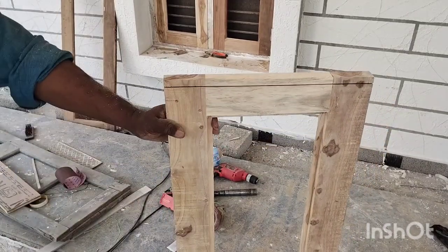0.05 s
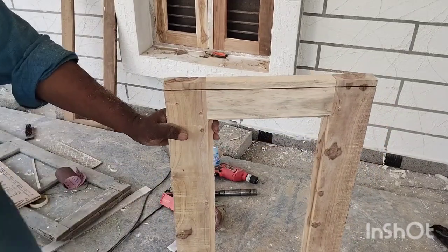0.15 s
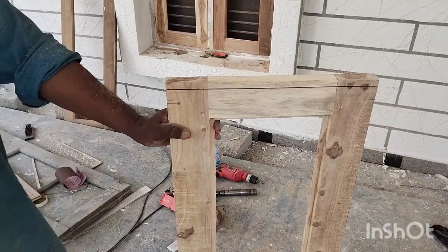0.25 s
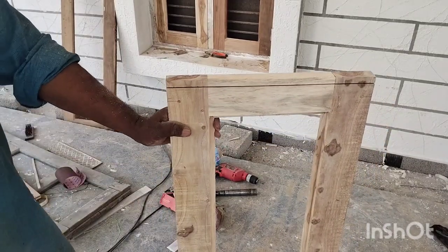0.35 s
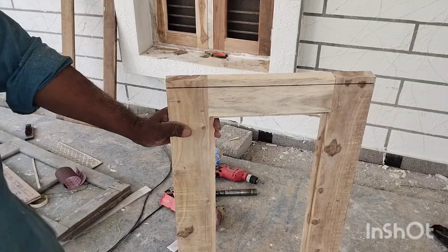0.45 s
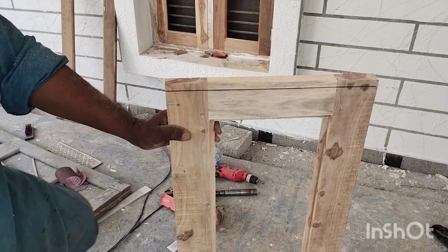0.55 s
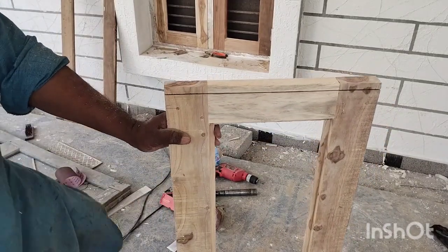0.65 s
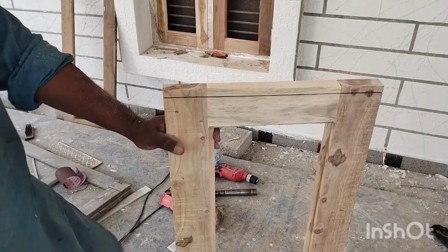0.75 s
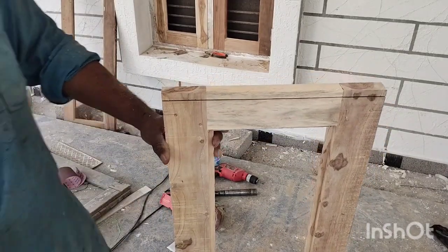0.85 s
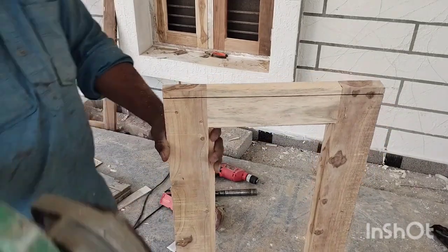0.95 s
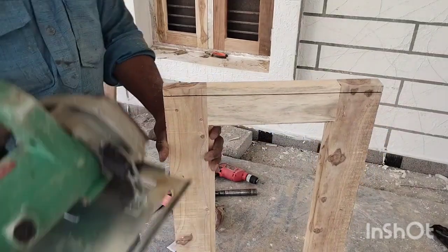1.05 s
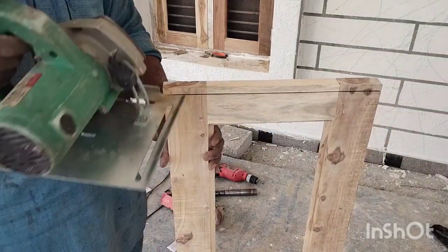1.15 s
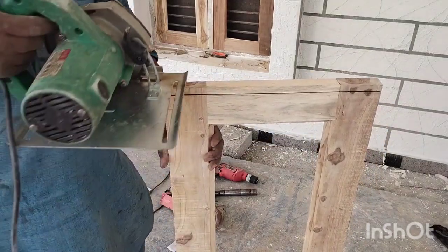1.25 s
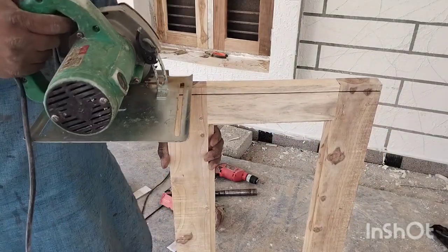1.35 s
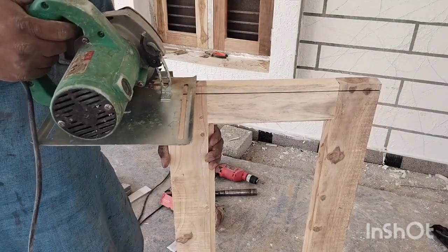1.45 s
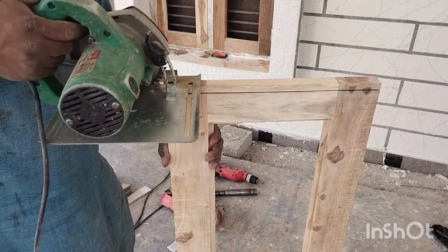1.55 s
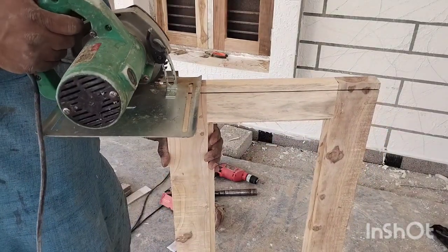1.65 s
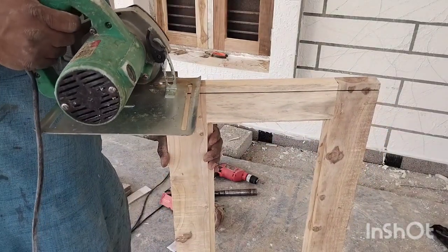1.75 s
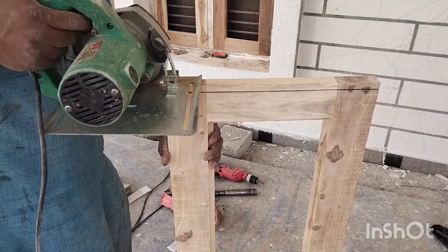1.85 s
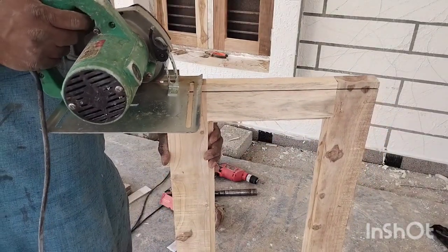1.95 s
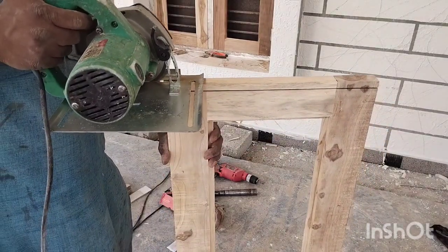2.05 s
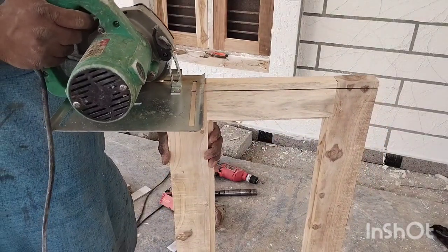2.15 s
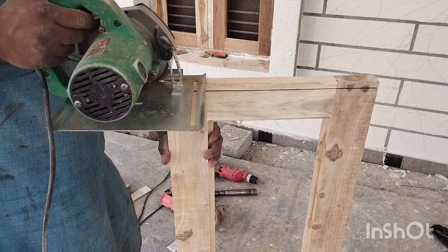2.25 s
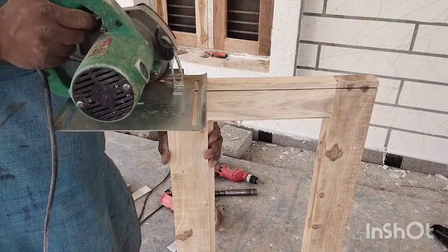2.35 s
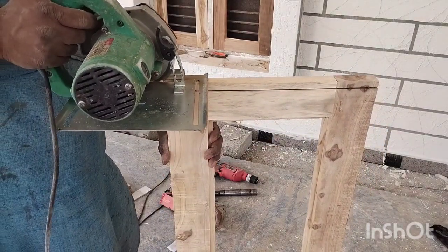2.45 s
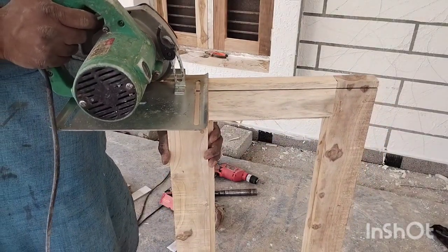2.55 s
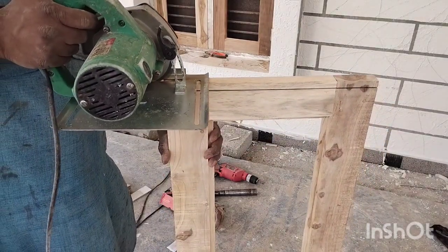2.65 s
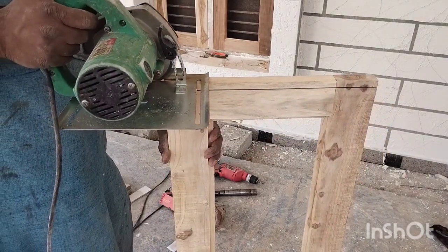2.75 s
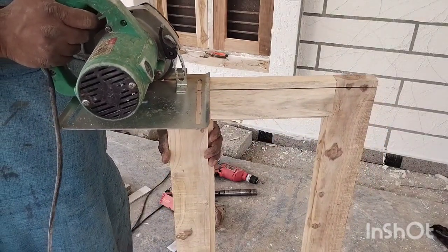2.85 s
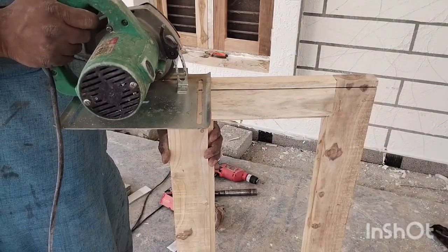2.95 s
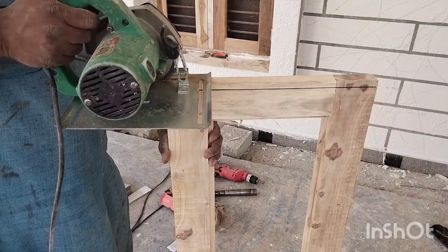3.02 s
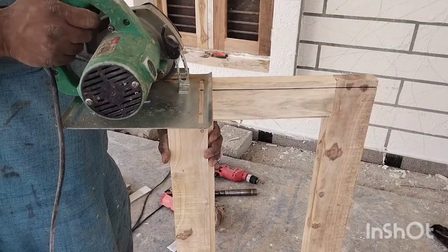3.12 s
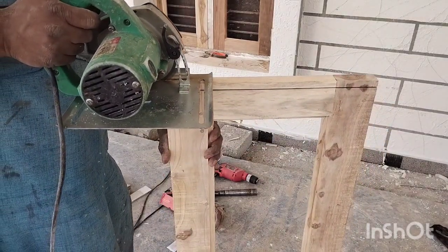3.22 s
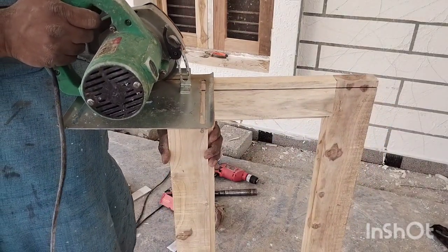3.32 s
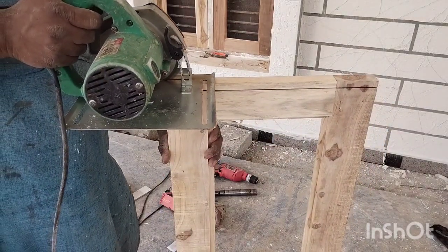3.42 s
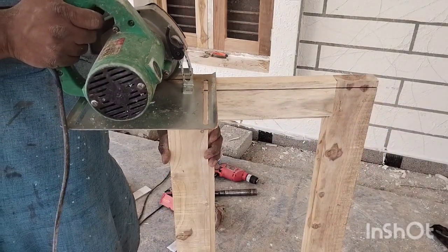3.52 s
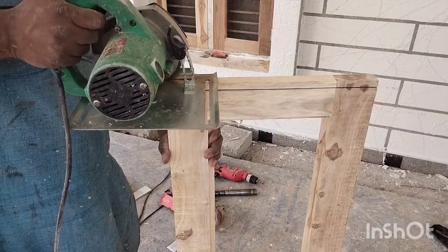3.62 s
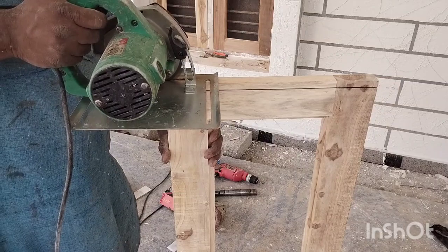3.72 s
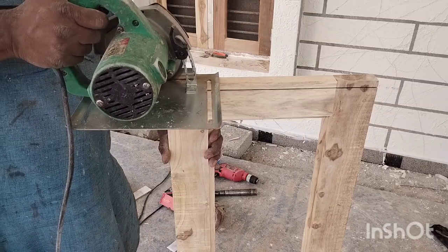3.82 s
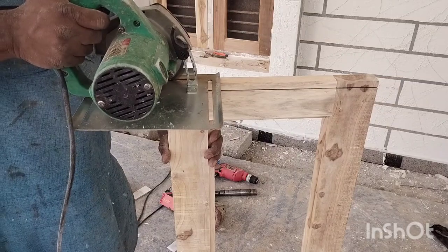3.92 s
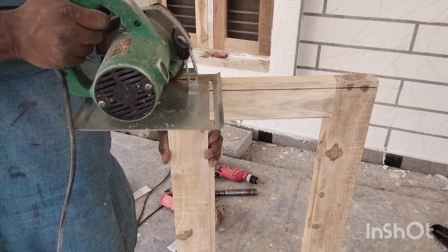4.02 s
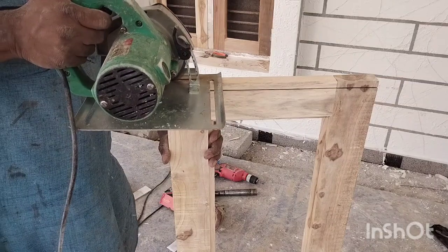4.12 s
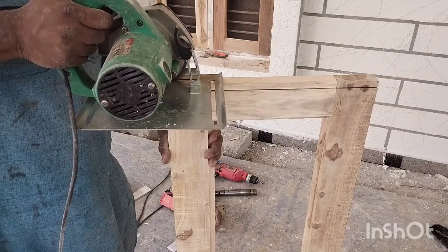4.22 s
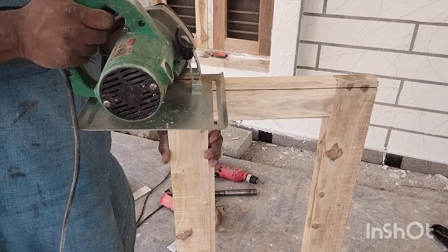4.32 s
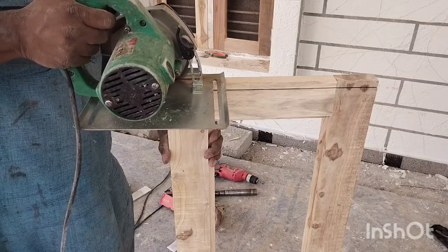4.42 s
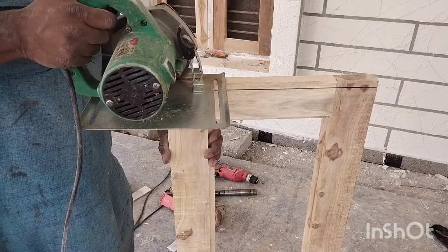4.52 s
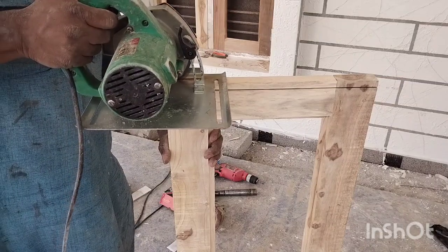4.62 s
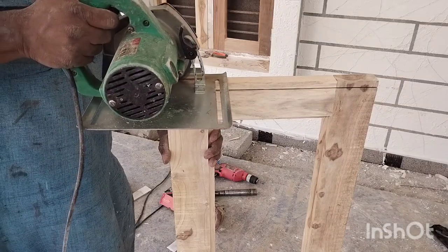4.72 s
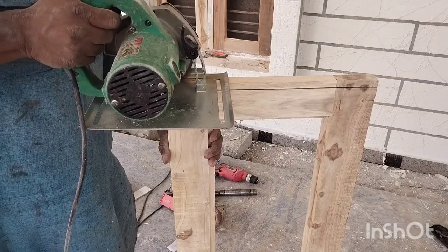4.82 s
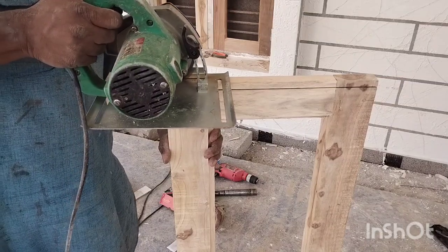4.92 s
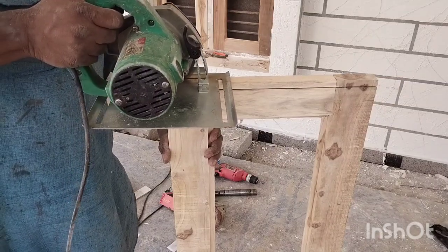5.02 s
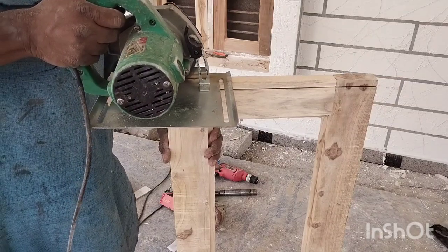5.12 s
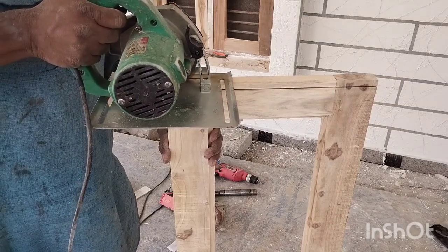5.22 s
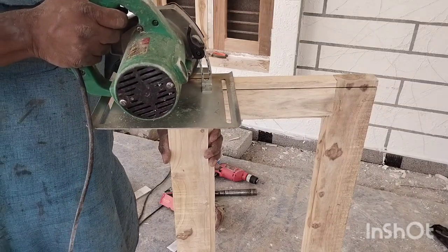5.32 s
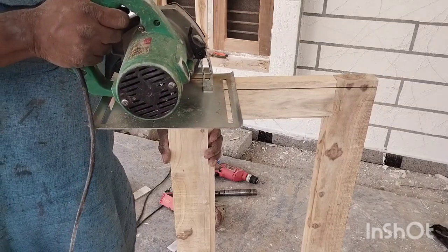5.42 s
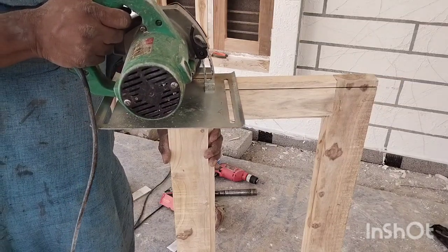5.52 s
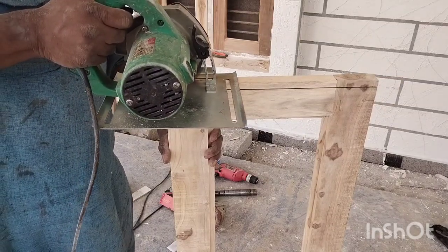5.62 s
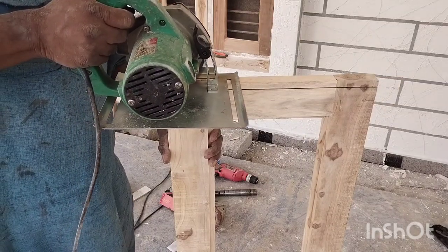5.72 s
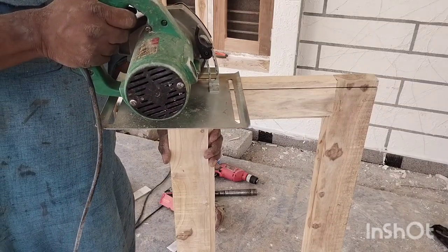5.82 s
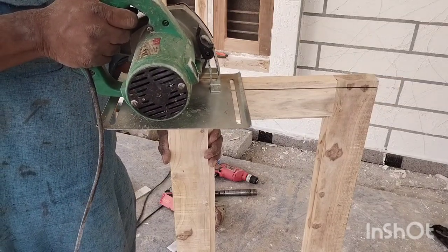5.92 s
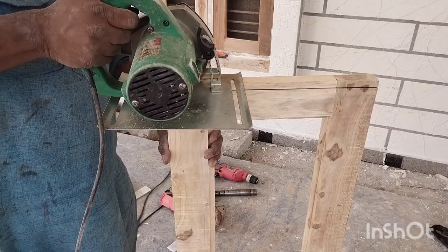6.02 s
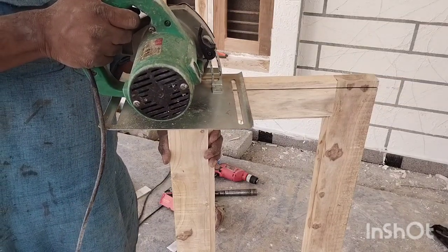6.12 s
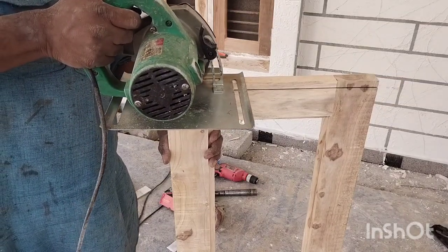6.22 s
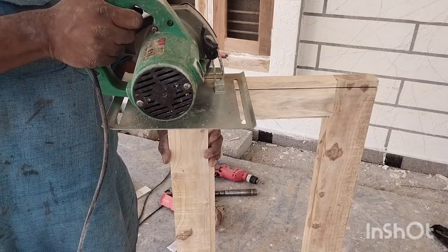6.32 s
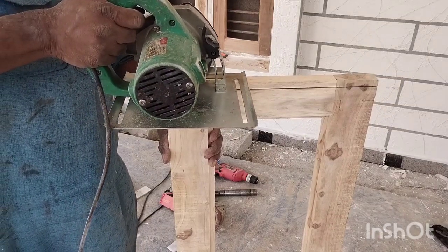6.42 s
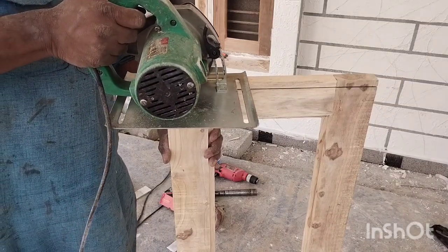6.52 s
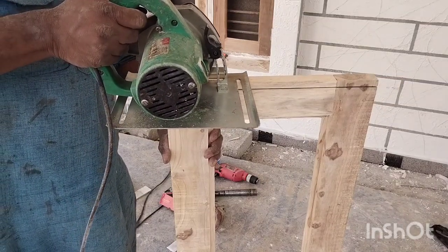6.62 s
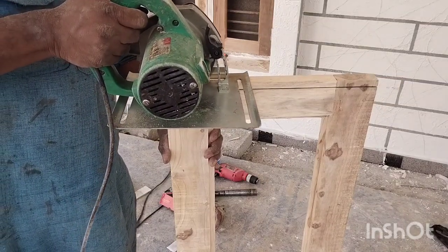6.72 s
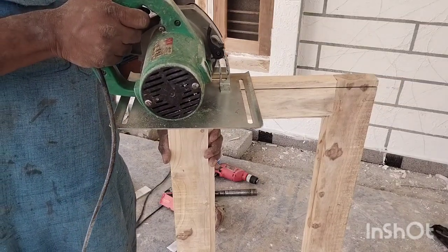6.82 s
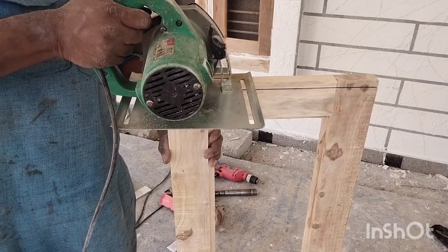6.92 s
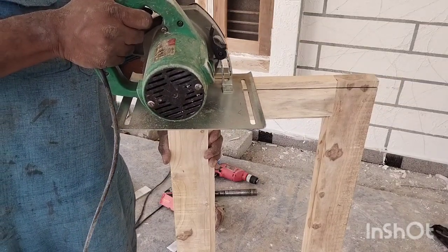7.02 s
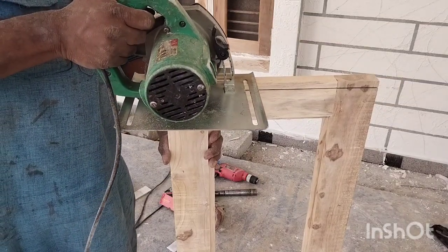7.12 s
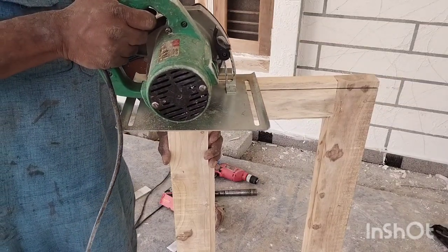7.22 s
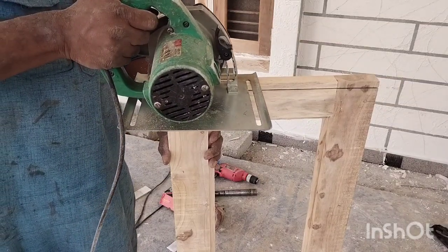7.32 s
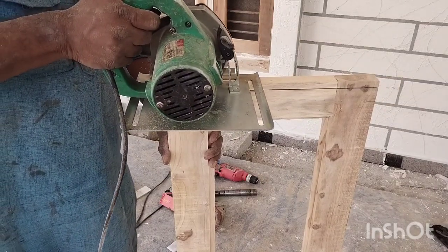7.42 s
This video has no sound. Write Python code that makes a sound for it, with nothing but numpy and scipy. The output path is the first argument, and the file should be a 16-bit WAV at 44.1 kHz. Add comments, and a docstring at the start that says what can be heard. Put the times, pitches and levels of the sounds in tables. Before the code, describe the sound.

Close by in a walled yard, a handheld electric saw is set on a wooden frame with light knocks, cloth rustle and a brief metallic chatter. The motor starts whining and the blade screeches into the wood. A loud, steady rasp of cutting follows, with ringing steel and a high whistle that glides up, holds, then falls as the motor begins to slow.

```python
"""A walled yard: a hand-held power saw is lifted onto a wooden frame and cuts into it.
Sleeves rustle, hands rub, the frame rings to knocks and the steel base plate rattles on the wood.
The motor starts and whines in its fan's rush. Teeth tear fibres in a dense rasp, the disc
screeches and sings in its modes, and a piercing whistle glides above. Near the end the motor sags."""
import sys
import numpy as np
from scipy import signal
from scipy.fft import rfft, irfft, next_fast_len
from scipy.io import wavfile
from scipy.ndimage import map_coordinates

SR = 44100
rng = np.random.default_rng(int(sys.argv[2]) if len(sys.argv) > 2 else 0)


def store_pcm(level_fs):
    """Save levels as 16-bit WAV."""
    pcm = np.round(np.clip(level_fs, -1, 1) * 32767).astype(np.int16)
    wavfile.write(sys.argv[1], SR, np.atleast_2d(pcm).T)


N = 328986
START_S, REV_S, SAG_S = 2.455, 3.255, 6.91
WORKING_HZ, USUAL_CUT_DB = 528, -31.5


# tooth bite: (time [s], relative level [dB])
BITE_DEPTH = [(2.5, -36), (2.68, -38), (2.92, -40.5), (3.14, -35.5), (3.28, -27), (3.5, -32.5), (3.72, -28),
              (4.3, -27.5), (4.62, -26), (4.97, -31), (5.35, -28), (5.75, -29), (6.2, -31), (6.8, -31.5),
              (7.22, -36), (7.45, -31.5)]
# tearing fibres: (frequency [Hz], gain [dB])
RASP_SPECTRUM = [(25, -61), (120, -33.5), (400, -14), (900, -6), (1600, -3.5), (2400, -0.5), (2900, 0),
                 (4100, 6), (5400, 3.5), (7000, 2.5), (8200, 9.5), (9000, -2), (11000, -5), (14000, -12)]
def cutting(wood_db=2.5, blade_db=11.5, crossover_hz=2200):
    """Teeth tear fibres in dense grains: lows from the wood, highs from the blade."""
    cut_db, = curves(BITE_DEPTH)
    bite = amp(cut_db + 0.9 * wobble(60)) * grains(rate_hz=2800, spread_db=3, life_s=0.0033)
    rasp = colour(RASP_SPECTRUM)
    lowpass = lambda f: 1 / (1 + (f / crossover_hz) ** 4)
    wood = amp(wood_db) * rush(lambda f: rasp(f) * lowpass(f)) * fade(2.4, 0.1)
    entry = 0.3 * fade(2.7, 0.36) + 0.69 * fade(3.3, 0.047)
    blade = amp(blade_db) * rush(lambda f: rasp(f) * (1 - lowpass(f))) * entry
    return bite * (wood + blade)


# whistle glide: (time [s], pitch [Hz])
WHISTLE_GLIDE = [(3.55, 7150), (3.63, 7420), (3.7, 7640), (3.8, 7880), (3.9, 8040), (4.2, 8242),
                 (4.54, 8285), (5.08, 8075), (5.8, 7907), (6.15, 7987), (6.78, 8040), (6.92, 7800),
                 (7.02, 7680), (7.1, 7200)]
def whistle(undertone_ratio=0.585, hum_divisor=40):
    """A piercing tone, as of teeth whipping the air, over an undertone and a faint hum."""
    pitch_hz, = curves(WHISTLE_GLIDE)
    angle = phase(pitch_hz * (1 + 0.0004 * wobble(60)))
    envelope = amp(-18) * stroke(3.47, 2.3, attack_s=0.21, release_s=0.51) * (1 - fade(7.1, 0.05))
    flutter = amp(2 * wobble(22) + wobble(5))
    pair = np.sin(angle) + amp(-15) * np.sin(undertone_ratio * angle)
    tone = yard(envelope * flutter * pair, wet_db=-10)
    hum_angle = phase(pitch_hz / hum_divisor * shaft_hz() / WORKING_HZ) + 0.6 * wobble(40)
    hum = sum(amp(db) * np.sin(k * hum_angle) for k, db in [(1, -47), (2, -40), (4, -38.5)])
    swell = amp(1.8 * wobble(14)) * fade(3.7, 0.35)
    return tone + yard(swell * hum, wet_db=-10) * (1 - fade(6.75, 2.3))


# thin partials: (pitch at working speed [Hz], slope [Hz per shaft Hz], width [Hz], relative level when slow
# [dB], relative level at full speed [dB])
GLIDING_PARTIALS = [(3190, 6.2, 55, -34, -35), (4090, 7.7, 55, -33, -38), (4020, -5, 60, -35, -42),
                    (5400, 11.2, 45, -33, -34), (6870, 14.2, 60, -27, -26), (7890, 14.9, 120, -28, -37),
                    (8455, 16.2, 70, -23, -29), (8930, 16.8, 90, -31, -46), (7300, -18.5, 75, -34, -40),
                    (8380, -8, 85, -34, -44), (10160, 18, 70, -32, -36), (8630, -22, 70, -35, -46),
                    (9860, -9, 70, -30, -36), (11920, 20.5, 70, -32, -39), (10170, -22.5, 60, -32, -39),
                    (13790, 23.5, 80, -34, -36), (14300, 27, 140, -34, -50), (11340, -31, 85, -34, -40),
                    (13170, -16.5, 100, -35, -37)]
def whine(core_share=0.35, damping_db_per_db=0.26):
    """Thin partials: some rise with the motor's speed and whine, others glide against it."""
    cut_db, = curves(BITE_DEPTH)
    offset_hz = shaft_hz() + 0.5 * wobble(30) - WORKING_HZ
    full = full_speed()
    damping_db = damping_db_per_db * (cut_db - USUAL_CUT_DB)  # a deeper bite damps the partials
    out = np.zeros((2, N))
    for hz, slope, width_hz, slow_db, full_db in GLIDING_PARTIALS:
        level_db = slow_db * (1 - full) + (full_db - damping_db) * full
        tone = amp(level_db) * np.exp(1j * phase(hz + slope * offset_hz))
        # clean core and noisy skirt, drawn per ear
        core = core_share * np.exp(1j * rng.normal(0, 0.6, (2, 1)))
        skirt = np.sqrt(1 - core_share ** 2) * np.array([flicker(width_hz), flicker(width_hz)])
        out += np.sqrt(2) * np.real(tone * (core + skirt))
    return out * amp(1 + 2 * wobble(25)) * fade(START_S, 0.035)


# modes of the lightly rubbing blade: (frequency [Hz], width [Hz], gain [dB])
SCREECH_MODES = [(2210, 60, 0), (2390, 170, -5), (2900, 350, -13), (4000, 900, -14), (6350, 380, -7),
                 (6830, 70, -2), (12400, 700, -10.5)]
# blade entering the wood: (start [s], length [s], level [dB])
ENTRY_GROANS = [(2.597, 0.43, -32), (2.973, .33, -27)]
# blade modes at working speed: (frequency [Hz], width [Hz], gain [dB])
SINGING_MODES = [(2650, 160, -12), (3650, 120, -15), (4150, 90, -12), (6520, 300, -4), (7380, 110, 2),
                 (11700, 130, -12), (12150, 450, -16)]
def singing_blade(damping_db_per_db=0.41):
    """The disc screeches and groans on entry, sings at full speed and rasps again near the end."""
    cut_db, = curves(BITE_DEPTH)
    entry = fade(START_S, 0.047) * (1 - fade(3.4, 0.26))
    screech = amp(-23.5 + 3.4 * wobble(20)) * entry * rush(steel(SCREECH_MODES))
    strain = sum(amp(db) * stroke(s, length_s, attack_s=0.094, release_s=0.06)
                 for s, length_s, db in ENTRY_GROANS)
    groan = strain * grains(rate_hz=500, spread_db=2, life_s=0.0047) * rush(steel([(2180, 660, 0)]))
    singing_db = -19 - damping_db_per_db * (cut_db - USUAL_CUT_DB) + 2.2 * wobble(14)
    singing = amp(singing_db) * full_speed() * (clock() > REV_S) * rush(steel(SINGING_MODES))
    ending = amp(-22.5 + 2.9 * wobble(21)) * fade(6.3, 0.16)
    late_rasp = ending * rush(steel([(6300, 310, 8), (7220, 100, -13)]))
    return screech + groan + singing + late_rasp


# thin squeals: (start [s], end [s], first pitch [Hz], last pitch [Hz], relative level [dB])
THIN_SQUEALS = [(2.6, 3.3, 2221, 2196, -30), (2.473, 2.77, 5482, 5488, -33), (2.52, 3.1, 7630, 7440, -25.5),
                (3.33, 3.62, 6350, 6810, -23), (7.04, 7.26, 7400, 6300, -22), (7.22, 7.5, 3075, 3010, -30)]
def squeals(gain_db=1.5):
    """Thin, unsteady squeals: held tones, the motor's whine sagging and climbing, the whistle's fall."""
    out = np.zeros(N)
    for start_s, end_s, first_hz, last_hz, db in THIN_SQUEALS:
        pitch_hz = np.interp(clock(), [start_s, end_s], [first_hz, last_hz]) + 14 * wobble(160)
        gate = fade(start_s, 0.021) * (1 - fade(end_s, 0.039))
        out += amp(db + gain_db) * gate * np.sqrt(2) * np.sin(phase(pitch_hz))
    return yard(out * amp(2.1 * wobble(35)), wet_db=-1)


# fan air: (frequency [Hz], gain [dB])
FAN_SPECTRUM = [(25, -61), (90, -14), (400, -22.5), (1500, -10.5), (2300, 4.5), (3000, -7), (5000, -9),
                (6200, 7), (7500, 4), (8700, -37), (11500, -35), (12600, -10), (14000, -10)]
# motor housing: (frequency [Hz], width [Hz], gain [dB])
HOUSING_MODES = [(820, 31, -1), (2286, 93, 8)]
def motor():
    """The cooling fan's air pulses once a turn, and the housing rings."""
    angle = phase(shaft_hz() * (1 + 0.0016 * wobble(90)))
    working = fade(3.22, 0.17)
    draught = amp(1.4 * wobble(22)) * (1 + 0.34 * np.sin(angle))
    air = draught * (amp(-24.5) * (1 - working) + amp(-22) * working) * rush(colour(FAN_SPECTRUM))
    housing_gain = amp(-37) * (1 - working) + amp(-31) * working
    housing = rush(steel(HOUSING_MODES)) * amp(3.3 * wobble(18)) * housing_gain
    return (air + housing) * fade(START_S, 0.043)


def shaft_hz(start_hz=479, droop_hz_per_s=22, climb_s=0.135, sag_hz_per_s=52):
    """Turns a second: a slow droop, a quick climb to working speed, a final sag."""
    t = clock()
    light_hz = start_hz - droop_hz_per_s * (np.minimum(t, REV_S) - START_S)
    shortfall_hz = (WORKING_HZ - light_hz) * np.exp(-np.maximum(t - REV_S, 0) / climb_s)
    return WORKING_HZ - shortfall_hz - sag_hz_per_s * np.maximum(t - SAG_S, 0)


def full_speed(span_hz=11):
    """1 at working speed, 0 well below it."""
    return np.exp(-((WORKING_HZ - shaft_hz()) / span_hz) ** 2)


# plate shaking on wood: (time [s], level [dB])
CHATTER_LEVEL = [(1.79, -13.5), (1.862, -20), (1.916, -15.5), (2.142, -19), (2.42, -19)]
# plate contacts: (frequency [Hz], gain [dB])
RATTLE_SPECTRUM = [(25, -42), (90, -20.5), (300, -11.5), (800, -5), (1500, -7), (2300, -8.5), (3300, 3),
                   (5000, -8), (6400, -4), (7700, -11), (11200, -16.5), (12300, -1), (13200, -8),
                   (14000, -10.5)]
# plate and housing: (frequency [Hz], width [Hz], gain [dB])
PLATE_MODES = [(813, 19, 2), (2280, 110, 8), (3205, 47, 15), (6200, 320, 3)]
# plate slips: (time [s], relative level [dB], t60 [s], ring offset [dB])
PLATE_SLIPS = [(1.5474, -15, 0.24, -28), (1.562, -6.5, 0.024, -12), (1.572, -15, 0.05, -11),
               (1.8721, -17, 0.033, 4), (1.936, -12, 0.035, 5.5), (1.994, -10, 0.032, 4.5),
               (2.082, -9, 0.022, 1), (2.1982, -9, 0.023, 4.5), (2.2275, -15.5, 0.056, 7),
               (2.417, -15.5, 0.04, 2)]
# slipping steel: (frequency [Hz], gain [dB])
SLIP_SPECTRUM = [(500, -16), (2500, -8.5), (3800, 6.5), (4800, -2), (6500, 6.5), (9000, 3.5), (14000, -6.5)]
def chatter():
    """The base plate rattles on the wood; each slip hisses and rings the steel's upper modes."""
    level_db, = curves(CHATTER_LEVEL)
    shake = amp(level_db + 0.51 * wobble(34.72)) * grains(rate_hz=1100, spread_db=2.5, life_s=0.0028)
    gate = fade(1.785, 0.017) * (1 - fade(2.476, 0.079))
    low_ring = rush(lambda f: amp(-6.5) * resonance(f, 786, 77) + resonance(f, 2277, 61))
    contacts = rush(colour(RATTLE_SPECTRUM))
    plate = rush(lambda f: sum(amp(db) * resonance(f, hz, width) for hz, width, db in PLATE_MODES))
    rattle = shake * gate * (contacts + amp(-6.5) * plate + amp(-9) * low_ring)
    slips = sum(amp(db) * decay(s, t60, attack_s=0.0018) for s, db, t60, _ in PLATE_SLIPS)
    rings = sum(amp(db + ring_db) * decay(s, t60, attack_s=0.00063)
                for s, db, t60, ring_db in PLATE_SLIPS)
    high_ring = rush(lambda f: resonance(f, 6250, 200) + amp(7) * resonance(f, 12560, 220))
    return rattle + amp(-0.5) * slips * rush(colour(SLIP_SPECTRUM)) + rings * high_ring


# blows: (time [s], relative level [dB], centre [Hz], t60 [s], relative ring [dB], crack [dB])
FRAME_KNOCKS = [(0.26, -17.5, 1480, 0.11, -23, -12), (0.3139, -8.5, 1320, 0.038, -35, -27),
                (0.452, -22.5, 2920, 0.13, -24, 2), (0.804, 3, 2230, 0.016, -27, -28),
                (1.196, -9, 2260, 0.046, -37, -15), (1.403, -10, 485, 0.081, -16, -12),
                (1.412, -3, 850, 0.041, -9.5, -10), (1.771, 0, 2300, 0.071, -3, -4.5),
                (1.783, -10, 2200, 0.02, -10, 6), (2.262, -4.5, 2350, 0.12, -31, -20),
                (2.355, -1.5, 2500, 0.083, -31, -13)]
# wooden frame: (frequency [Hz], gain [dB], t60 [s])
FRAME_MODES = [(367, -7, 0.11), (462, 2, 0.063), (624, -5, 0.046), (847, -3, 0.12), (2183, 15, 0.026)]
# dull bumps: (time [s], relative level [dB], pitch [Hz], t60 [s])
FRAME_BUMPS = [(.005, -36.5, 147.3, 0.9), (1.53, -20, 724, 0.065), (2.139, -19.5, 254, 0.15),
               (2.48, -37, 104, 0.43), (7.12, -25, 120, 0.074), (7.135, -39, 62, 0.3)]
def knocks(highpass_hz=45):
    """Each blow cracks, clacks in one resonance and rings the frame; bumps are damped sines."""
    out = np.zeros(N)
    for s, db, hz, t60, ring_db, crack_db in FRAME_KNOCKS:
        noise = rng.standard_normal(N)
        clack = unit(filtered(noise, lambda f: resonance(f, hz, 0.27 * hz)))
        impact = (clack + amp(crack_db) * noise) * decay(s, t60, attack_s=0.00075)
        ring = sum(amp(mode_db + rng.normal(0, 1.1)) * ping(s, mode_hz, mode_t60, attack_s=0.0032)
                   for mode_hz, mode_db, mode_t60 in FRAME_MODES)
        out += amp(db - 9) * (impact + amp(ring_db - 1) * ring)
    for s, db, hz, t60 in FRAME_BUMPS:
        out += amp(db) * ping(s, hz, t60, attack_s=0.0018)
    return yard(filtered(out, lambda f: (1j * f / (highpass_hz + 1j * f)) ** 2), wet_db=-4)


# sleeve strokes: (start [s], length [s], level [dB])
SLEEVE_STROKES = [(-.03, 0.023, -12.5), (0.02, 0.28, -34.5), (0.443, 0.062, -36), (0.661, 0.095, -28.5),
                  (0.764, 0.11, -33.5), (0.854, 0.049, -25), (0.919, 0.037, -35.5), (0.986, 0.058, -32.5),
                  (1.179, 0.03, -31), (1.218, 0.09, -34), (1.313, 0.039, -29), (1.39, 0.036, -34),
                  (1.595, .18, -32), (1.634, 0.026, -34)]
# cloth: (frequency [Hz], gain [dB])
CLOTH_SPECTRUM = [(25, -40), (80, -4.5), (300, -14), (700, -2.5), (1500, -2.5), (2100, 4), (4000, 2.5),
                  (7000, -3.5), (14000, -5.5)]
# hand along the frame: (start [s], length [s], level [dB])
HAND_STROKES = [(0, 0.14, -40), (0.483, 0.25, -56), (.74, 0.23, -46.5), (1.047, 0.26, -47.5),
                (1.29, 0.2, -39), (1.5, 0.22, -47)]
# hand on wood: (frequency [Hz], gain [dB])
RUB_SPECTRUM = [(25, -29), (70, 24), (150, 21), (330, 30), (700, 23.5), (1500, -74)]
def handling(cloth_floor_db=-42, rub_floor_db=-57):
    """Cloth rustles and hands rub on wood, stroke by stroke, until the saw takes over."""
    sleeve = amp(cloth_floor_db) + sum(amp(db) * stroke(s, length_s, attack_s=0.015, release_s=0.015)
                                       for s, length_s, db in SLEEVE_STROKES)
    hand = amp(rub_floor_db) + sum(amp(db) * stroke(s, length_s, attack_s=0.036, release_s=0.043)
                                   for s, length_s, db in HAND_STROKES)
    rustle = sleeve * rush(colour(CLOTH_SPECTRUM)) * grains(rate_hz=1500, spread_db=4.5, life_s=0.012)
    return (rustle + hand * rush(colour(RUB_SPECTRUM))) * (1 - fade(3.8, 0.61))


# wall reverberation: (frequency [Hz], t60 [s])
YARD_DECAY = [(200, 0.052), (2000, 0.38), (12000, 0.11)]
def yard(x, wet_db):
    """A mono source at both ears, with the short answer of the walls."""
    hz, t, spectra = signal.stft(rng.standard_normal((2, SR // 3)), SR, nperseg=256)
    tail = signal.istft(spectra * amp(-60 * t / along(YARD_DECAY, hz)[:, None]), SR, nperseg=256)[1]
    echo = signal.fftconvolve(x[None], tail / np.linalg.norm(tail[0]), axes=1)[:, :N]
    return (x + amp(wet_db) * echo) / np.hypot(1, amp(wet_db))


# likeness of left and right: (frequency [Hz], correlation [0..1])
EAR_CORRELATION = [(30, 0.54), (200, 0.89), (800, 0.66), (1900, 0.24), (3400, 0.74), (5200, 0.09),
                   (14000, 0.04)]
def rush(response):
    """Coloured stereo noise of rms 1, alike in the bass and diffuse in the treble."""
    def mid_side(f):
        angle = np.arccos(np.clip(along(EAR_CORRELATION, f), -1, 1)) / 2
        return response(f) * np.array([np.cos(angle), np.sin(angle)])
    mid, side = filtered(rng.standard_normal((2, N)), mid_side)
    return unit(np.array([mid + side, mid - side]))


def grains(rate_hz, spread_db, life_s):
    """Envelope (rms 1) of many tiny, decaying contacts of uneven size."""
    hits = rng.random(N) < rate_hz / SR
    size = np.minimum(rng.exponential(size=N), 5)
    pole = np.exp(-1 / (life_s * SR))
    energy = signal.lfilter([1], [1, -pole], hits * amp(spread_db * size) ** 2)
    return unit(np.sqrt(energy))


def stroke(start_s, length_s, attack_s, release_s):
    """Envelope that rises, holds and dies away."""
    t = clock() - start_s
    return np.clip(t / attack_s, 0, 1) * np.exp(-np.maximum(t - length_s, 0) / release_s)


def decay(start_s, t60, attack_s):
    """Envelope of a blow."""
    t = np.maximum(clock() - start_s, 0)
    return amp(-60 * np.minimum(t / t60, 3)) * (1 - np.exp(-t / attack_s))


def ping(start_s, hz, t60, attack_s):
    """One struck mode."""
    return decay(start_s, t60, attack_s) * np.sin(2 * np.pi * hz * (clock() - start_s))


def fade(centre_s, length_s):
    """Linear ramp from 0 to 1."""
    return np.clip((clock() - centre_s) / length_s + 0.5, 0, 1)


def wobble(rate_hz):
    """Smooth random curve through rate_hz knots a second."""
    knots = rng.standard_normal(int(N * rate_hz / SR) + 4)
    return map_coordinates(knots, [clock() * rate_hz], order=2)


def flicker(width_hz):
    """Complex random envelope (rms about 1) that widens a tone to a narrow band."""
    rate_hz = np.pi / 2 * width_hz
    knots = rng.standard_normal((int(N * rate_hz / SR) + 2, 2)) @ [1, 1j]
    return np.interp(clock(), np.arange(len(knots)) / rate_hz, knots) * np.sqrt(3 / 4)


def resonance(f, hz, width_hz):
    """Causal response of one resonance."""
    return 1j * f * width_hz / (hz * hz - f * f + 1j * f * width_hz)


def steel(modes):
    """Zero-phase response from modes: (frequency [Hz], width [Hz], gain [dB])."""
    return lambda f: sum(amp(db) * resonance(f, hz, width).real for hz, width, db in modes)


def colour(points):
    """Response from points: (frequency [Hz], gain [dB])."""
    return lambda f: amp(along(points, f))


def filtered(x, response):
    """Apply a frequency response."""
    size = next_fast_len(N + SR // 2)
    return irfft(rfft(x, size) * response(np.fft.rfftfreq(size, 1 / SR)), size)[..., :N]


def along(points, hz):
    """Interpolate on a log frequency axis."""
    knots_hz, values = np.transpose(points)
    return np.interp(np.log(hz + 1), np.log(knots_hz + 1), values)


def curves(rows):
    """One value per sample for each column after the time."""
    times_s, *columns = np.transpose(rows)
    return [np.interp(clock(), times_s, column) for column in columns]


def phase(hz):
    """Running phase [rad]."""
    return 2 * np.pi * np.cumsum(hz) / SR


def clock():
    """Sample times [s]."""
    return np.arange(N) / SR


def amp(db):
    """Decibels to gain."""
    return 10 ** (np.asarray(db) / 20)


def unit(x):
    """Scale to rms 1."""
    return x / np.sqrt(np.mean(x ** 2) + 1e-20)


def scene(left_lag_s=0.00013):
    """Everything happens slightly to the right, so the left ear hears it later."""
    placing = handling() + knocks() + chatter()
    sawing = motor() + whine() + singing_blade() + squeals() + cutting() + whistle()
    left, right = placing + sawing
    return np.array([filtered(left, lambda f: np.exp(-2j * np.pi * f * left_lag_s)), right])


def record(dry, top_hz=14300):
    """Brick-wall low-pass."""
    return filtered(dry, lambda f: f < top_hz)


dry = scene()
out = record(dry)
store_pcm(out)
```